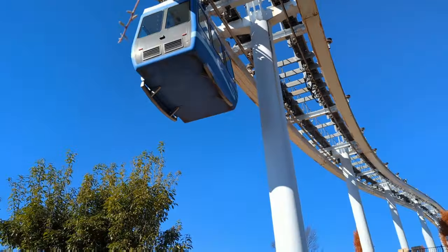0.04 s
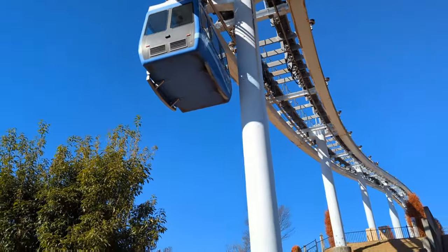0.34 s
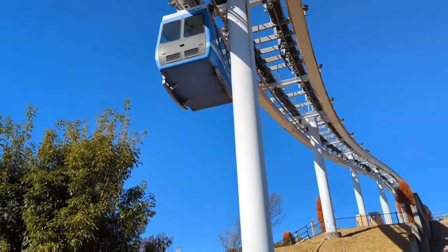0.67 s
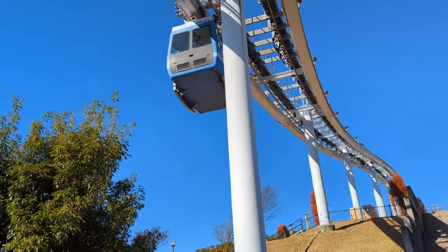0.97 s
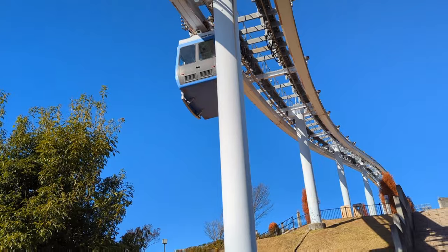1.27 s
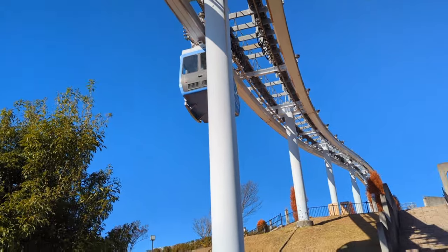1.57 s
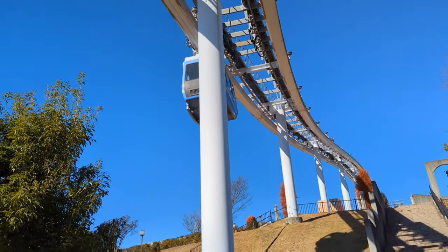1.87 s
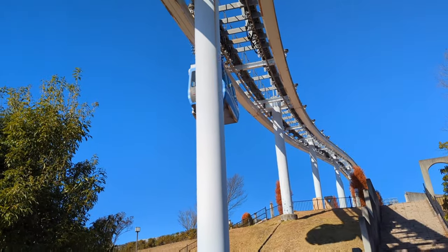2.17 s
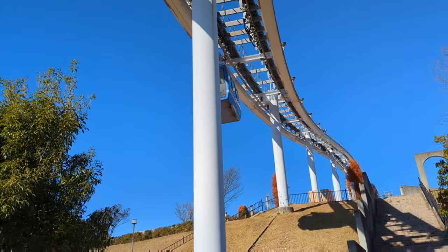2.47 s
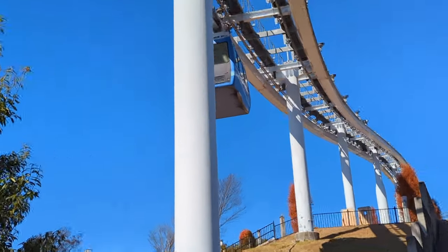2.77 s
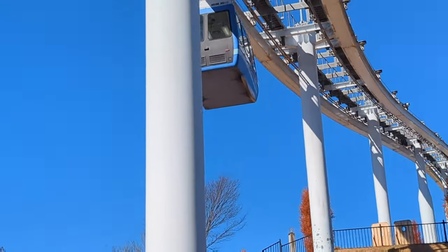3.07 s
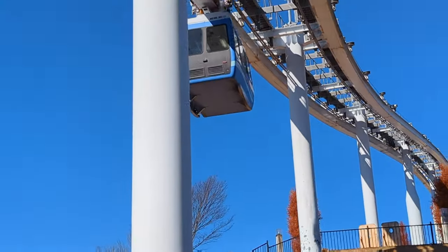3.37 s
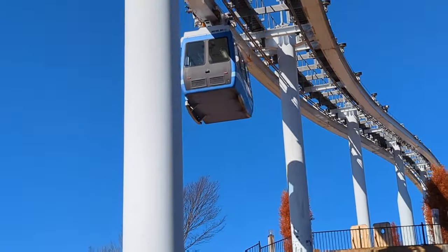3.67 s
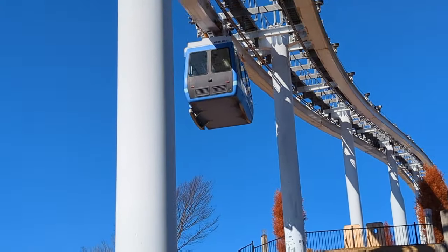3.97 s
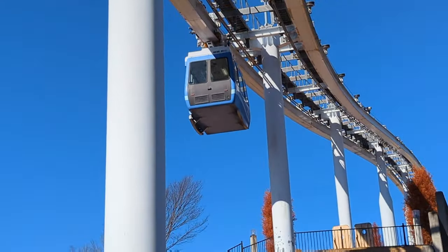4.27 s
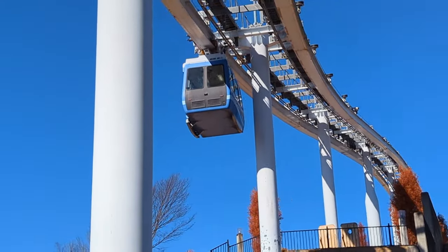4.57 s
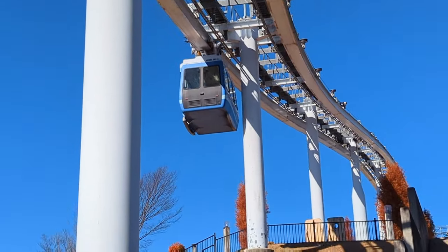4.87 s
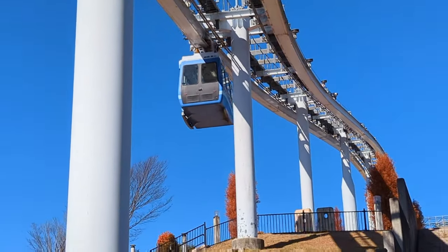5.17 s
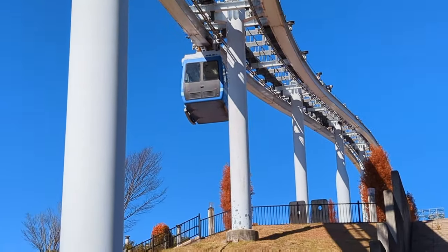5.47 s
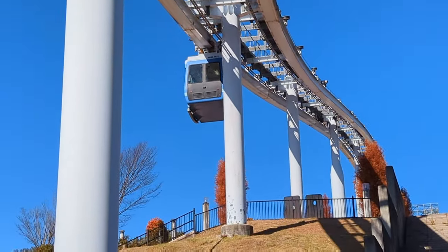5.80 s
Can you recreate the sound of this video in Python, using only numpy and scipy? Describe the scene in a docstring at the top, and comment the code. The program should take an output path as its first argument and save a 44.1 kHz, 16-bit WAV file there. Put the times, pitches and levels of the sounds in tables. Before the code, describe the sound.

A short metallic scrape and a cluster of sharp clanks open the sound of a hanging rail car moving off overhead in the open air. A low motor hum and the droning rumble of wheels on steel carry on throughout, with more clanks and ticks now and then. Midway, and again a little later, close dull knocks and thuds come from fingers on the right side of the hand-held recorder.

```python
"""A suspended rail car climbs away along its steel track overhead, outdoors.
Its drive hums; its wheels rumble, whine faintly and keep car and girder droning. The running gear
scrapes at first, then clanks over track fittings, all coloured by the same steelwork. A pillar
briefly shades the treble. Fingers tap, bump and scuff the hand-held recorder by its right microphone."""
import sys
import numpy as np
from scipy import signal
from scipy.fft import irfft, next_fast_len
from scipy.io import wavfile
from scipy.ndimage import uniform_filter1d

SR = 44100
rng = np.random.default_rng(int(sys.argv[2]) if len(sys.argv) > 2 else 0)


def inscribe(sig):
    """Save sig as 16-bit PCM at rate SR to the path in sys.argv[1].

    A 1-D sig is mono; a 2-D sig holds one channel per row.
    Samples are clipped to [-1, 1] before scaling.
    """
    pcm = np.round(np.clip(np.atleast_2d(sig).T, -1, 1) * 32767)
    wavfile.write(sys.argv[1], SR, pcm.astype(np.int16))


N = 261954

# slow swell of the drive hum: t/s, level/dB
HUM_SWELL = [(0, -36.5), (.45, -44), (.82, -36), (1.12, -44), (1.5, -35), (2.2, -31.5), (2.55, -34),
             (3.22, -28.5), (3.5, -31.5), (4.25, -38), (4.6, -30), (4.95, -32.5), (5.45, -37), (5.94, -33)]
# side that the car is heard from: t/s, left over right/dB
CAR_PAN = [(0, -1), (.8, 0), (1.2, 5), (2.5, 7.5), (2.8, 2.5), (5.94, 0.5)]
# upper wheel noise fading as the car moves off: t/s, level over its far level/dB
NEARNESS = [(0, 6), (.82, 2.5), (1.08, -0.23), (5.3, 0.5), (5.94, -3.5)]
# the wheels rub harder for a moment: middle t/s, length/s, boost/dB
RUBS = [(.32, 0.14, 5.5), (1.3, 0.13, 4), (3.06, 0.19, 5), (3.8, 0.46, 6.5), (4.18, 0.15, 6)]
SHADE_SIZZLE_DB, SHADE_HISS_DB, SHADE_RATTLE_DB = -5, -8, -11.5   # treble lost behind the pillar


def from_db(db):
    """Decibels to gain."""
    return 10 ** (np.asarray(db) / 20)


def rms_one(x):
    """Scale to unit power."""
    return x / np.sqrt(np.mean(x ** 2) + 1e-20)


def in_time(curve):
    """A curve of (time, value) points at every sample."""
    return np.interp(np.arange(N) / SR, *np.transpose(curve))


def at_hz(points, hz):
    """Read a spectrum on a log-frequency axis."""
    pitches, values = np.transpose(points)
    return np.interp(np.log(hz), np.log(pitches), values)


def panned(db):
    """Left and right gains; positive dB leans left."""
    return from_db(np.array([[.5], [-.5]]) * db)


def passing(t, middle_s, length_s):
    """Rises smoothly from 0 to 1, holds and falls again."""
    away = np.square(2 * (t - middle_s) / length_s)
    return np.exp2(-np.minimum(away * away, 60))


def spells(rows):
    """Smooth bumps from rows of (middle, length, dB, ..): one curve per dB column."""
    t = np.arange(N) / SR
    return sum(np.outer(db, passing(t, s, length)) for s, length, *db in rows)


def drift(rate_hz):
    """Smooth random wander with unit power."""
    hop, settle = 40, 2000
    pole = np.exp(-2 * np.pi * rate_hz * hop / SR)
    white = rng.standard_normal(N // hop + settle + 2)
    slow = signal.lfilter([1], [1, -2 * pole, pole * pole], white)[settle:]
    return np.interp(np.arange(N) / hop, np.arange(len(slow)), rms_one(slow))


def resonate(x, hz, width_hz):
    """One resonance with unit gain at its peak."""
    r = np.exp(-np.pi * width_hz / SR)
    poles = [1, -2 * r * np.cos(2 * np.pi * hz / SR), r * r]
    return signal.lfilter(np.array([1, 0, -1]) * (1 - r * r) / 2, poles, x + 1e-18)


def spread(pair, hz):
    """Two unrelated signals become left and right, as alike as the air leaves them at this pitch."""
    # sound that reaches both microphones alike: f/Hz, share
    likeness = [(50, 0.19), (110, 0.42), (300, 0.85), (700, 0.69), (2400, 0.4), (5000, 0.089),
                (14000, 0.093)]
    alike = at_hz(likeness, hz)
    return np.sqrt((1 + alike) / 2) * pair[0] + np.sqrt((1 - alike) / 2) * pair[1] * [[1], [-1]]


def noise(colour_db, size):
    """Stereo noise whose density follows a function of pitch; 0 dB over one kilohertz has unit power."""
    count = next_fast_len(size, real=True)
    hz = np.maximum(np.arange(count // 2 + 1) * SR / count, 1)
    white = rng.standard_normal((2, len(hz), 2)) @ [1, 1j]
    spectrum = spread(white, hz) * from_db(colour_db(hz))
    return irfft(spectrum, count)[:, :size] * np.sqrt(count * SR / 4000)


def narrow_noise(hz, width_hz):
    """A resonance shaken at random, in stereo, with steep skirts and unit power."""
    shaking = spread(rng.standard_normal((2, N)), hz)
    return rms_one(resonate(resonate(shaking, hz, width_hz), hz, 4 * width_hz))


def behind_pillar(t):
    """How far the pillar hides the car, from 0 to 1."""
    return passing(t, middle_s=2.02, length_s=1.37)


def drive_hum(dip_db, hum_hz=148.47, wander_hz=.33):
    """Clean tones share the drive's near-steady speed; each throbs in its own way with the load."""
    # tones of the drive: multiple of its pitch, level/dB, throb depth/dB, throb rate/Hz
    tones = [(1, -3.7, 1.15, 6.6), (1.835, -14.5, 3.4, 3.5)]
    phase = 2 * np.pi * np.cumsum(hum_hz + wander_hz * drift(5.5)) / SR
    out = 0
    for ratio, db, throb_db, throb_hz in tones:
        load = drift(throb_hz)
        throb = rms_one(load - uniform_filter1d(load, int(1.65 * SR / throb_hz)))
        out += np.sqrt(2) * np.sin(ratio * phase) * from_db(db + throb_db * throb)
    return out * from_db(in_time(HUM_SWELL) + dip_db) * panned(.67)


def drones(rumble_db, hum_share=.38, usual_hum_db=-35, steadiness=.029):
    """Wheels and drive keep the low resonances of car and girder swelling and beating."""
    # resonances of car and girder: f/Hz, width/Hz, level against the rumble/dB
    modes = [(274.5, 8.4, 2.5), (298.8, 8, -3.5), (130.2, 9.7, -1), (446.9, 14, -5)]
    out = 0
    for hz, width_hz, db in modes:
        swell = drift(width_hz) + 1j * drift(width_hz)
        swell /= (np.abs(swell) + .17) ** steadiness
        carrier = np.exp(2j * np.pi * hz * np.arange(N) / SR)
        out += from_db(db) * rms_one(np.real(swell * carrier))
    shaking_db = rumble_db + hum_share * (in_time(HUM_SWELL) - usual_hum_db)
    return out * from_db(shaking_db) * panned(.74)


def rolling_band(low_hz, high_hz):
    """The noise of wheels on steel between two soft edges, with unit power."""
    # spectrum of the rolling: f/Hz, density/dB
    colour = [(25, -38.5), (40, 5.5), (55, 11), (90, 4.5), (180, 9.5), (350, 5.5), (550, 2.5), (900, -4),
              (1500, -13.5), (2500, -23), (3600, -29), (5200, -38), (6000, -37), (9000, -43), (15000, -47)]

    def band_db(hz):
        return at_hz(colour, hz) - 10 * np.log10(1 + (low_hz / hz) ** 24 + (hz / high_hz) ** 24)
    return rms_one(noise(band_db, N))


def rolling(rumble_db, patchy_db=1.5, jolt_db=.34, rustle_db=-60, sizzle_db=-75.5, hiss_db=-83.5):
    """Wheel noise over a deep rumble: jolts shake it, rubs brighten it, the pillar dulls it."""
    # deep rumble of air and grip on the case: t/s, level/dB
    air_and_grip = [(0, -68), (.4, -52.5), (1.2, -57.5), (2.6, -52.5), (3.75, -52), (4.05, -54),
                    (5.94, -55.5)]
    edges_hz = [20, 100, 1000, 3100, 5700, 20000]
    shake_db = jolt_db * drift(20)
    deep, low, rustle, sizzle, hiss = [rolling_band(a, b) * from_db(shake_db + patchy_db * drift(19))
                                       for a, b in zip(edges_hz, edges_hz[1:])]
    pan_db, rub_db = in_time(CAR_PAN), spells(RUBS)[0]
    hidden = behind_pillar(np.arange(N) / SR)
    upper = (rustle * from_db(rustle_db + .36 * rub_db)
             + sizzle * from_db(sizzle_db + .78 * rub_db + SHADE_SIZZLE_DB * hidden)
             + hiss * from_db(hiss_db + rub_db + SHADE_HISS_DB * hidden))
    return (deep * from_db(in_time(air_and_grip)) * panned(-4)
            + low * from_db(rumble_db + 4) * panned(.19 * pan_db)
            + upper * from_db(in_time(NEARNESS)) * panned(pan_db))


def whine(pan_db=6, pulse_db=2, rub_share=.36):
    """The wheels sing in thin, pulsing notes that swell with every rub and fade behind the pillar."""
    # notes of the rubbing wheels: f/Hz, width/Hz, level/dB
    notes = [(2400, 37, -84.5), (3090, 25, -90.5), (4270, 45, -90.5), (4596, 120, -85.5)]
    singing = sum(from_db(db + pulse_db * drift(11)) * narrow_noise(hz, width_hz)
                  for hz, width_hz, db in notes)
    shade_db = SHADE_SIZZLE_DB * behind_pillar(np.arange(N) / SR)
    return singing * from_db(rub_share * spells(RUBS)[0] + shade_db) * panned(pan_db)


def scrape(grain_db=1.5, pan_db=-10, squeal_fade_db_per_s=21.5):
    """A sliding contact rasps and squeals on the rail as the car moves off; the squeal dies first."""
    # envelope of the scrape: t/s, level/dB
    envelope = [(0, -53), (.15, -55.5), (.3, -59), (.45, -65.5), (.9, -55.5), (1.1, -91)]
    # spectrum of the rasp: f/Hz, density/dB
    colour = [(300, -37.5), (1200, -3), (1700, -5.5), (2600, -5.5), (3400, -18), (4400, -32), (6000, -52),
              (14000, -42.5)]
    # rough squeal of the contact: f/Hz, width/Hz, level/dB
    notes = [(2140, 90, -1), (2390, 240, -4.5), (2790, 28, -9), (4010, 70, -14)]
    rasp = noise(lambda hz: at_hz(colour, hz), N)
    squeal = sum(from_db(db) * narrow_noise(hz, width_hz) for hz, width_hz, db in notes)
    squeal *= from_db(-squeal_fade_db_per_s * np.arange(N) / SR)
    return (rasp + squeal) * from_db(in_time(envelope) + grain_db * drift(60)) * panned(pan_db)


def steelwork(x):
    """The steel colours what wheels and running gear excite, like a chain of peaking filters."""
    # resonances (+) and dead spots (-) of the steel: f/Hz, width/Hz, gain/dB
    peaks = [(1140, 40, 5), (1360, 40, 3), (1720, 80, 4), (1880, 60, 6), (2430, 50, 7), (2500, 50, -5),
             (2600, 90, 4), (2850, 50, 3), (2950, 50, -6), (3030, 50, 4), (3170, 70, 4), (3420, 60, 5),
             (3570, 90, -6), (3810, 60, 7), (4110, 80, -7), (4240, 70, 8), (4400, 80, -4), (4770, 80, 4),
             (5240, 160, 8), (5650, 250, -5), (6550, 200, 5), (7300, 100, 3), (8400, 250, 5)]
    sections = []
    for hz, width_hz, db in peaks:
        gain, half_width = from_db(db / 2), np.pi * width_hz / SR
        tuning = -2 * np.cos(2 * np.pi * hz / SR)
        zeros = [1 + half_width * gain, tuning, 1 - half_width * gain]
        poles = [1 + half_width / gain, tuning, 1 - half_width / gain]
        sections.append(np.array(zeros + poles) / poles[0])
    return signal.sosfilt(sections, x)


def taps(sag=.46, sag_s=.0077):
    """A fingertip makes one dead tick, then the case gives a low thud that sinks in pitch."""
    # fingers on the case: t/s, tick level/dB, case f/Hz, fingertip cut-off/Hz,
    # thud level/dB, thud f/Hz, thud t60/s, left microphone gain/dB
    touches = [(.5203, -19.5, 560, 520, -45, 150, .03, -12), (.733, -29, 900, 500, -55, 150, .03, -7),
               (2.4918, -11, 1100, 520, -18, 58, .2, -25), (2.578, -34, 200, 400, -23, 135, .07, -12),
               (2.6048, -29.5, 730, 1020, -50, 100, .04, -10), (2.666, -46, 520, 3800, -55, 100, .04, -3),
               (2.699, -30, 210, 400, -45, 150, .03, 0), (2.867, -28, 130, 400, -33, 150, .05, 0),
               (2.998, -29, 450, 500, -32, 66, .2, -20), (3.688, -40, 300, 400, -20, 135, .08, -5),
               (3.754, -19, 220, 5300, -26, 110, .06, -12), (3.8365, -25, 260, 400, -31, 62, .13, -9),
               (3.8405, -17.5, 180, 450, -25, 128, .05, -9), (3.9286, -18.5, 360, 2050, -29, 88, .09, -11)]
    out, t = np.zeros((2, N)), np.arange(int(.3 * SR)) / SR
    for s, tick_db, case_hz, soft_hz, thud_db, thud_hz, t60, left_db in touches:
        fingertip = signal.butter(3, soft_hz, fs=SR, output="sos")
        tick = signal.sosfilt(fingertip, resonate(-1.0 * (t == 0), case_hz, 1.3 * case_hz))
        lag = np.exp(-2 * np.pi * case_hz / SR)
        tick = signal.lfilter([-lag, 1], [1, -lag], tick)   # lows cross the case more slowly than highs
        phase = 2 * np.pi * np.cumsum(thud_hz * (1 + sag * np.exp(-t / sag_s))) / SR
        thud = signal.sosfilt(fingertip, -np.sin(phase) * from_db(-60 * t / t60))
        tap = from_db(tick_db) * tick / np.abs(tick).max() + from_db(thud_db) * thud
        start = int(s * SR)
        out[:, start:start + len(t)] += from_db([[left_db], [0]]) * tap
    return out


def struck_ring(burst, hz):
    """A part shaken by a burst of contacts rings near its own pitch, with the power of the burst."""
    width_hz = 34 + .03 * hz   # higher rings die sooner
    contacts = spread(rng.standard_normal((2, len(burst))), hz) * burst
    ring = resonate(resonate(contacts, hz, width_hz), hz, hz / 2)
    return rms_one(ring) * np.sqrt(np.mean(burst ** 2))


def crash(s, near_db, body_db, edge_db, size):
    """The noise of a clank at time s: a near one bites and rattles more, the pillar shades its top."""
    # spectrum of clashing steel: f/Hz, density/dB
    colour = [(90, -21.5), (220, 6), (380, 10.5), (600, 8), (800, -6.5), (1200, -2), (1800, -7),
              (2600, -11), (3400, -14.5), (5000, -22), (7000, -26.5), (10000, -29.5), (14000, -30)]
    bite_db = edge_db / 2 + .51 * near_db
    rattle_db = edge_db - 7.5 + 2.37 * near_db + SHADE_RATTLE_DB * behind_pillar(s)
    tone = [(550, body_db), (1100, 0), (2400, 0), (3200, bite_db), (4300, edge_db), (9000, rattle_db)]
    # while the car is close, its highest rattle lies to the left
    right_cut = [(3000, 0), (8000, 13 * np.clip(2.7 - s, 0, 1))]
    return noise(lambda hz: at_hz(colour, hz) + at_hz(tone, hz) - at_hz(right_cut, hz) * [[0], [1]], size)


def clanks(chatter_db=.5, tail_db=-18, tail_s=.065):
    """Each clank is a burst of tiny contacts that rings the struck part and dies along the girder."""
    # running gear on track fittings: t/s, level/dB, rise/s, fall/s, low body/dB, hard edge/dB,
    # rings of the struck part [(f/Hz, level/dB), ..]
    hits = [(.535, -38.5, 0.012, 0.049, -1, -10, [(1540, -4.5), (1930, -12.5), (3050, -27)]),
            (0.546, -61, 0.0023, .008, -1, -16, [(1400, -13), (3700, -22)]),
            (0.603, -65, 0.0063, 0.065, -12, 25, [(6450, -1), (8400, -4)]),
            (.641, -34, 0.014, 0.022, -13.5, 4.5, [(1098, -15), (1750, -3), (2449, -6.5), (2620, -13),
            (3150, -12), (3817, -18)]), (.662, -40.5, 0.0068, 0.016, -3, 0, [(361, 6.5), (1750, -2)]),
            (.712, -46, 0.01, 0.12, -1.5, -4, [(1910, -16)]),
            (0.728, -64.5, 0.005, 0.01, 3, 23, [(5240, -3)]),
            (0.819, -38.5, 0.042, 0.018, -11, -10.5, [(1350, -6.5), (1600, -8.5), (2040, -6.5),
            (3050, -13)]), (1.19, -69.5, 0.014, 0.035, 0, 0.5, [(3950, -7.5)]),
            (1.99, -54.5, 0.015, 0.64, -11, -8, [(3030, -19)]),
            (2.071, -70.5, 0.031, 0.055, 5, 17, [(3720, -2), (4700, -13)]),
            (2.294, -46.5, 0.0066, 0.046, 2, -3, [(460, 4), (1160, -7), (2580, -15), (3870, -14)]),
            (2.886, -55, 0.011, 0.034, 9.5, 11, [(1890, 2), (4250, -12.5), (5260, -7), (6420, -13)]),
            (2.894, -73.5, 0.0035, 0.0054, 3, 28, [(6500, 7.5)]),
            (3.288, -38, 0.013, 0.027, -9.5, -0.5, [(370, 0.5), (715, -6), (1145, -6.5), (1680, -5.5),
            (2330, -7), (2720, -9.5), (3400, -12), (4240, -20), (5200, -24.5)]),
            (3.346, -42, 0.0069, 0.039, -10, -6, [(1690, -6), (1880, -12), (2570, -10.5), (4240, -22)]),
            (4.08, -61.5, 0.032, 0.074, 13.5, -6, [(4900, -10.5)]),
            (4.940, -47, 0.014, 0.015, 3.5, -16, [(615, 10.5), (1550, -2.5), (2150, -15)]),
            (5.005, -61.5, 0.012, 0.04, -13, 13.5, [(1920, 2)]),
            (5.057, -47.5, 0.0069, 0.042, -14, -2, [(1140, -5.5), (2900, -14), (3850, -21)]),
            (5.222, -57, 0.0098, 0.038, 13.5, -18.5, [(640, 10.5)]),
            (5.426, -55, 0.019, 0.029, 7, -21, [(1900, -2.5), (2200, -12)]),
            (5.489, -59.5, 0.0083, .022, -8, 0, [(1140, 3)])]
    out, t = np.zeros((2, N)), np.arange(int(.56 * SR)) / SR
    ending = np.minimum((t[-1] - t) / .2, 1) ** 2
    chatter = rms_one(from_db(chatter_db * drift(200)))
    pan_db, near_db = in_time(CAR_PAN), in_time(NEARNESS)
    for s, db, rise, fall, body_db, edge_db, modes in hits:
        start, after = int(s * SR), np.maximum(t - rise, 0)
        attack = np.sin(np.pi / 2 * np.minimum(t / rise, 1)) ** 2
        decay = np.exp(-after / fall) + from_db(tail_db) * np.exp(-after / tail_s)
        burst = attack * decay * ending
        clash = burst * crash(s, near_db[start], body_db, edge_db, len(t))
        ring = sum(from_db(mode_db) * struck_ring(burst, hz) for hz, mode_db in modes)
        span = slice(start, start + len(t))
        clank = clash[:, :N - start] * chatter[span] + ring[:, :N - start]
        out[:, span] += clank * from_db(db) * panned(pan_db[start])
    return out


def scuffs(pan_db=-9):
    """Skin slides briefly on the case, with a rasp or a small squeak."""
    # finger slides: middle t/s, length/s, f/Hz, width/Hz, level/dB
    slides = [(3.757, 0.017, 4170, 600, -56), (3.87, 0.07, 4730, 260, -73),
              (3.912, 0.065, 1510, 765, -60.5)]
    t = np.arange(N) / SR
    return sum(from_db(db) * passing(t, s, length) * narrow_noise(hz, width_hz)
               for s, length, hz, width_hz, db in slides) * panned(pan_db)


def scene(right_lag_samples=8):
    """The car is heard a little earlier on the left; the fingers are on the recorder itself."""
    # rumble of the rolling wheels: t/s, level/dB
    rumble = [(0, -53.5), (.3, -43.5), (.48, -46), (1.4, -47.5), (2.05, -50.5), (2.42, -47), (3.1, -48.5),
              (3.45, -46), (4.4, -50.5), (4.78, -47.5), (5.3, -47), (5.65, -49), (5.94, -47.5)]
    # brief dips in the low sounds: middle t/s, length/s, hum change/dB, rumble change/dB
    dips = [(.03, 0.12, -16, 2.5), (.62, 0.11, -34, -4), (1.01, 0.15, -9, -3.5), (3.905, 0.28, -24, -9.5)]
    hum_dip_db, rumble_dip_db = spells(dips)
    rumble_db = in_time(rumble) + rumble_dip_db
    lows = drive_hum(hum_dip_db) + drones(rumble_db)
    left, right = lows + steelwork(rolling(rumble_db) + whine() + scrape() + clanks())
    car = np.array([left, np.pad(right, (right_lag_samples, 0))[:N]])
    return car + taps() + scuffs()


def record(dry, bass_cut_hz=42, top_cut_hz=15000):
    """The microphones lose the deepest bass; the top is cut."""
    bass_cut = signal.butter(6, bass_cut_hz, "high", fs=SR, output="sos")
    top_cut = signal.ellip(10, .2, 80, top_cut_hz, fs=SR, output="sos")
    fade_out = np.minimum(np.arange(N)[::-1] / (.003 * SR), 1)
    return signal.sosfilt(top_cut, signal.sosfilt(bass_cut, dry)) * fade_out


dry = scene()
out = record(dry)
inscribe(out)
```